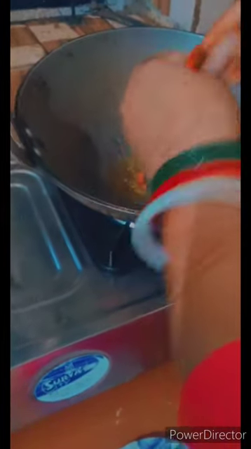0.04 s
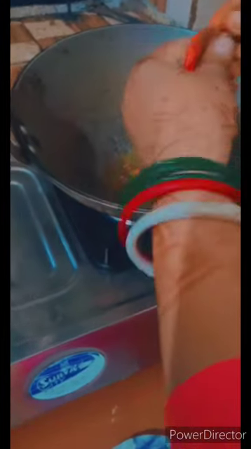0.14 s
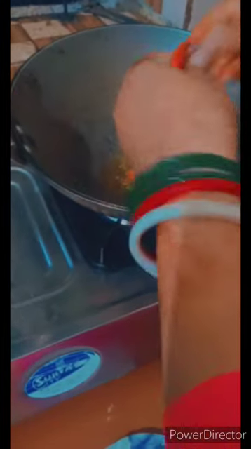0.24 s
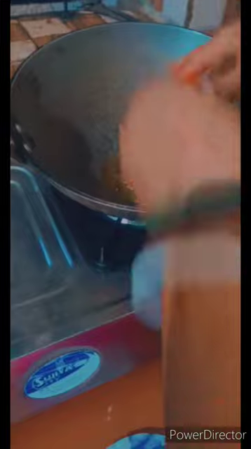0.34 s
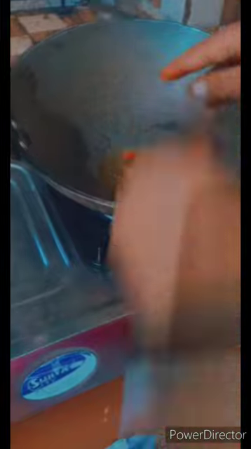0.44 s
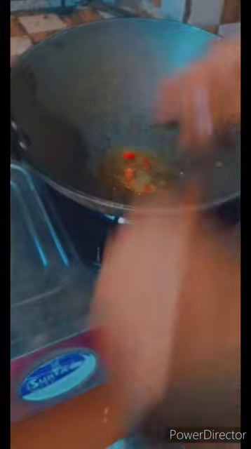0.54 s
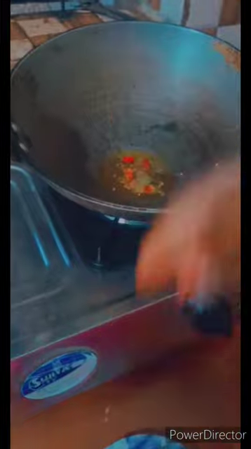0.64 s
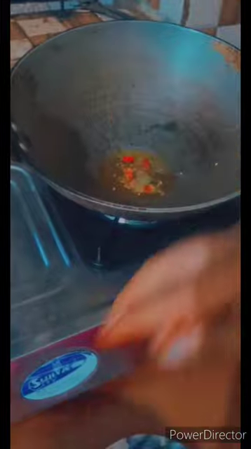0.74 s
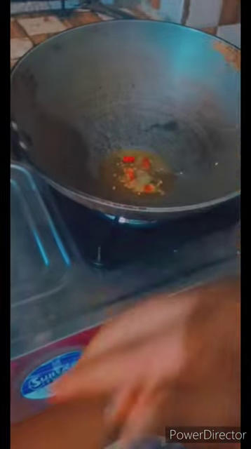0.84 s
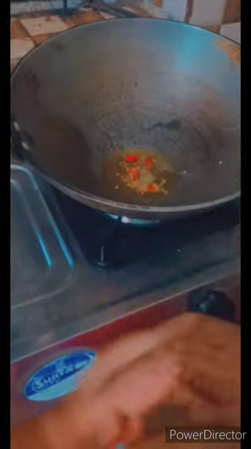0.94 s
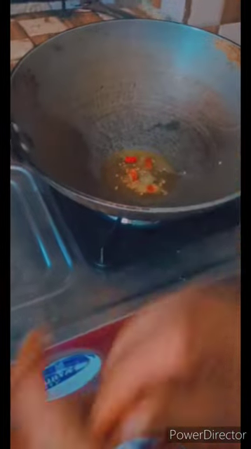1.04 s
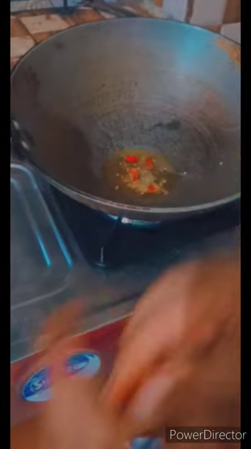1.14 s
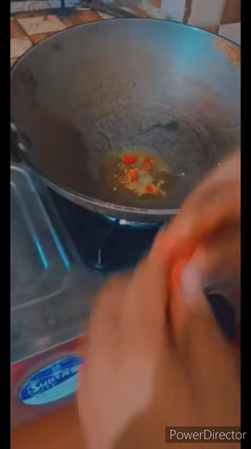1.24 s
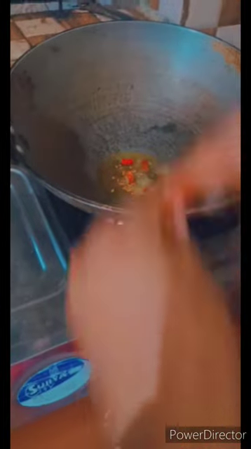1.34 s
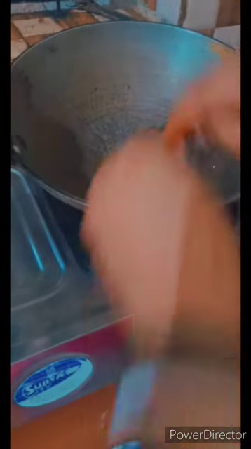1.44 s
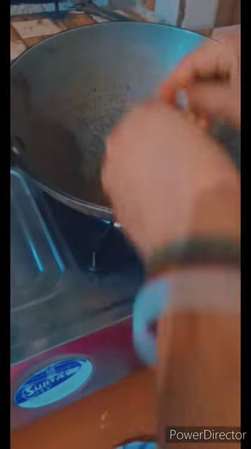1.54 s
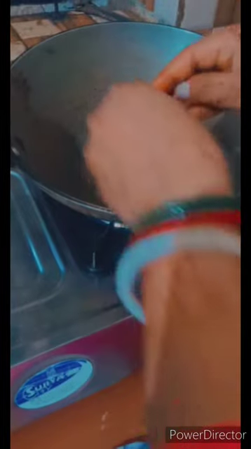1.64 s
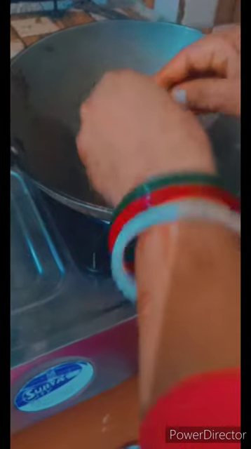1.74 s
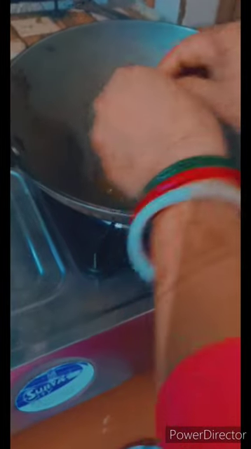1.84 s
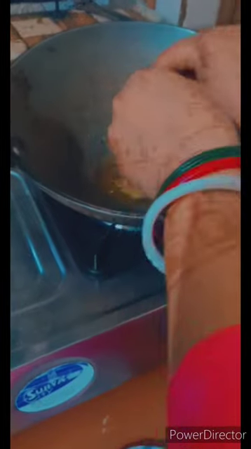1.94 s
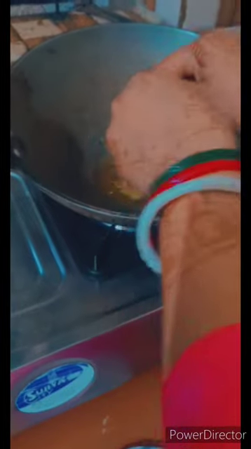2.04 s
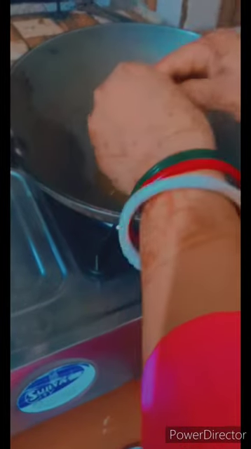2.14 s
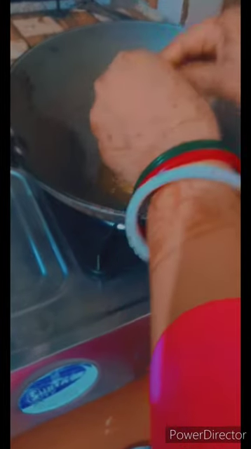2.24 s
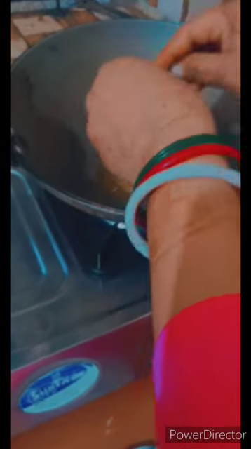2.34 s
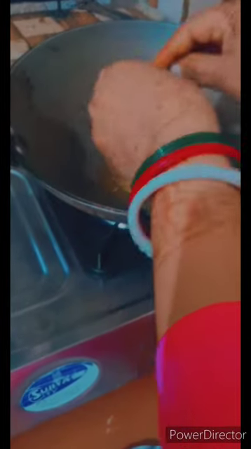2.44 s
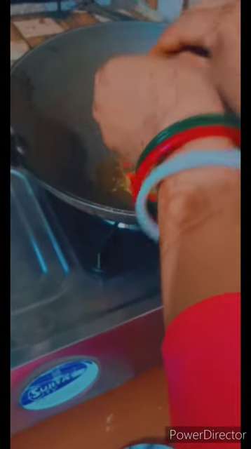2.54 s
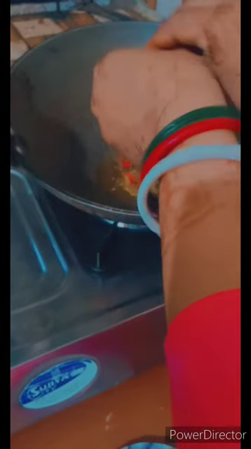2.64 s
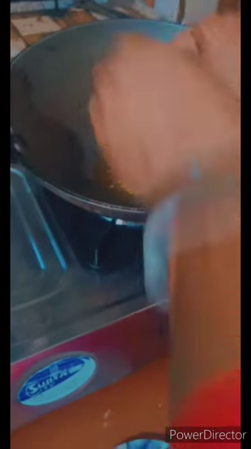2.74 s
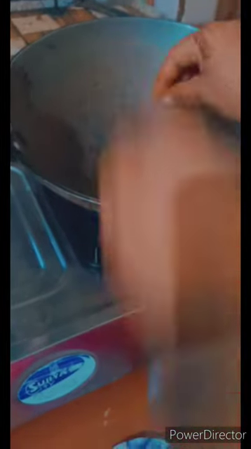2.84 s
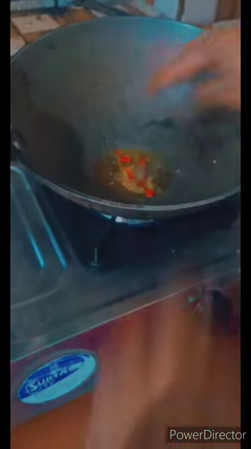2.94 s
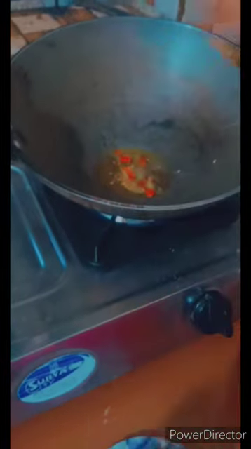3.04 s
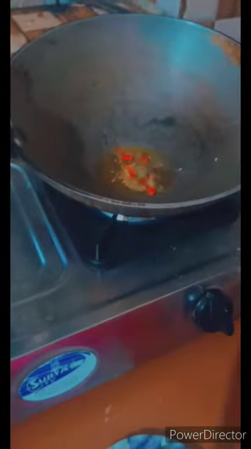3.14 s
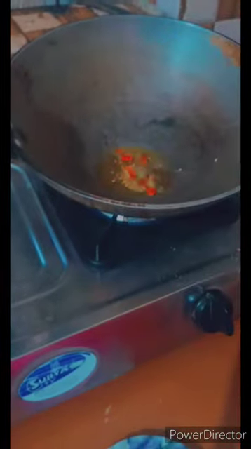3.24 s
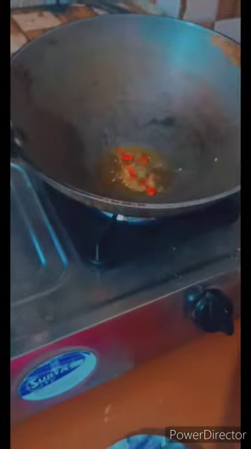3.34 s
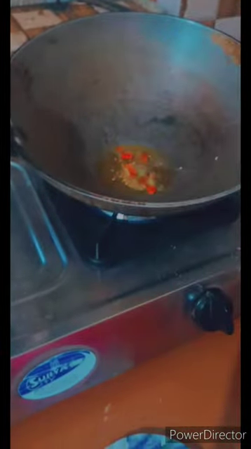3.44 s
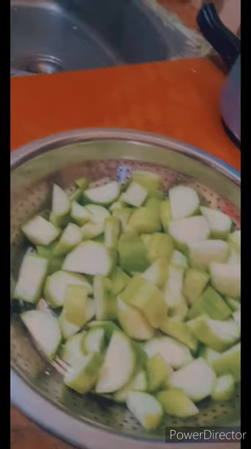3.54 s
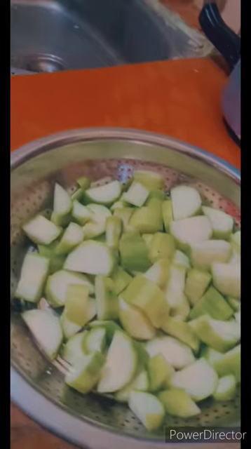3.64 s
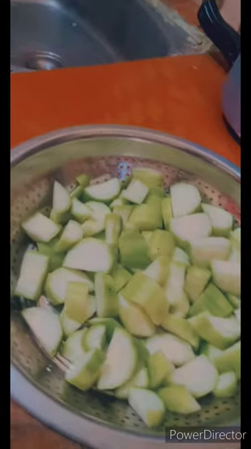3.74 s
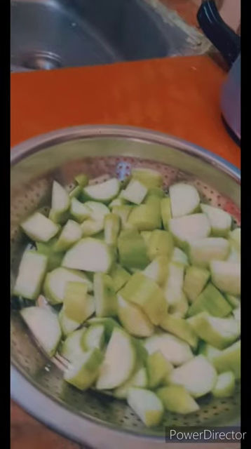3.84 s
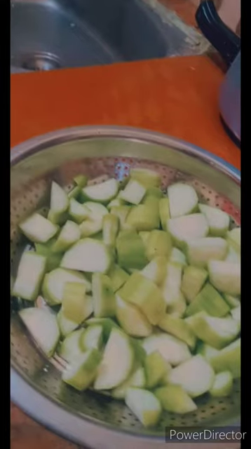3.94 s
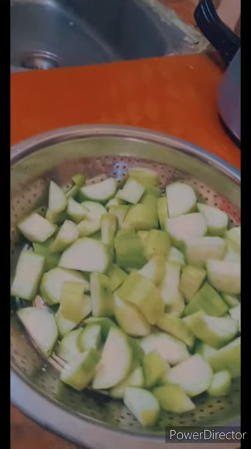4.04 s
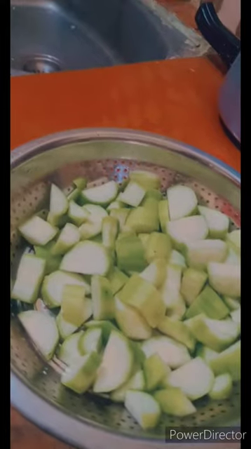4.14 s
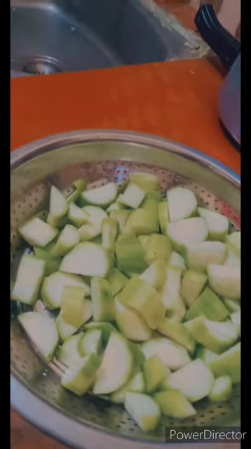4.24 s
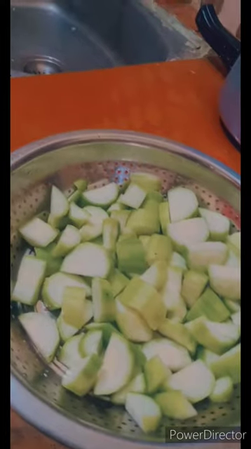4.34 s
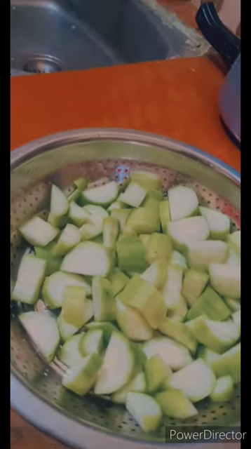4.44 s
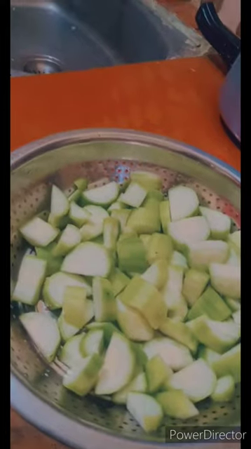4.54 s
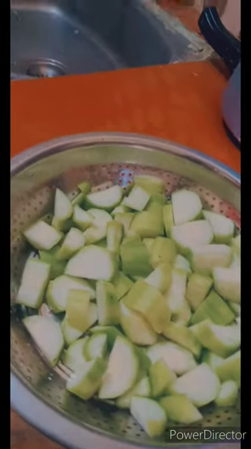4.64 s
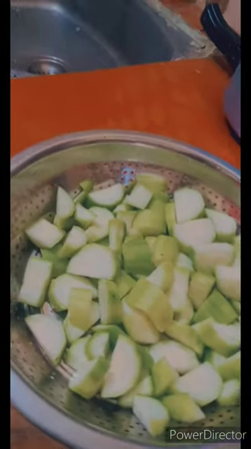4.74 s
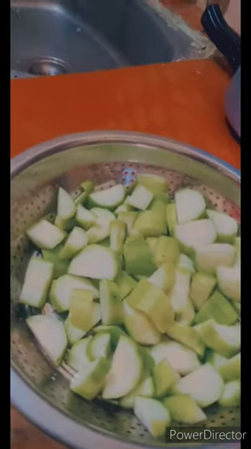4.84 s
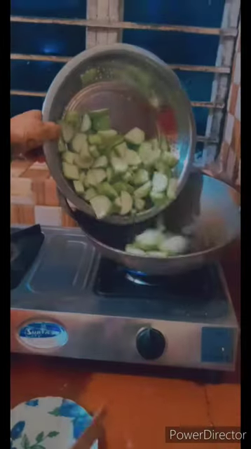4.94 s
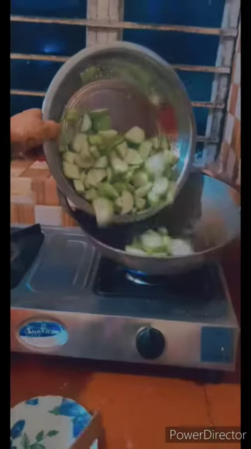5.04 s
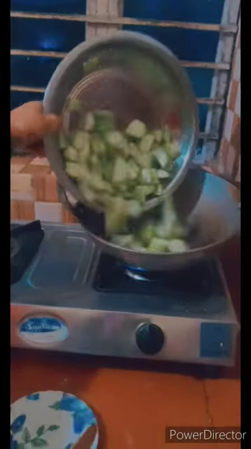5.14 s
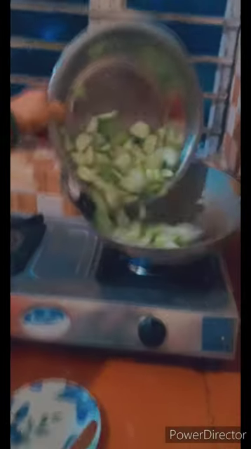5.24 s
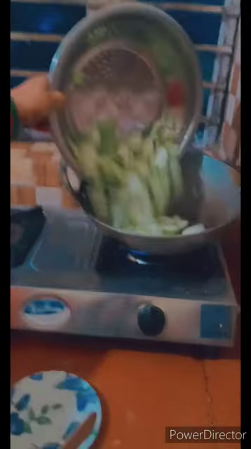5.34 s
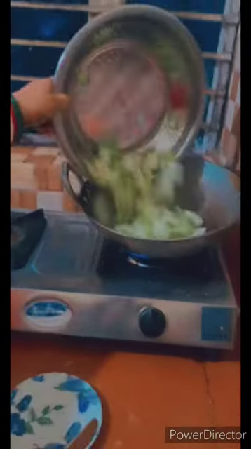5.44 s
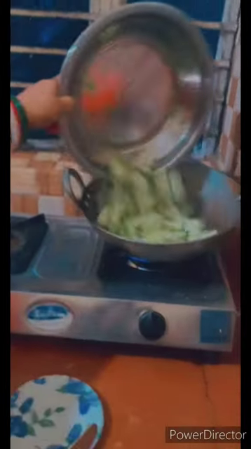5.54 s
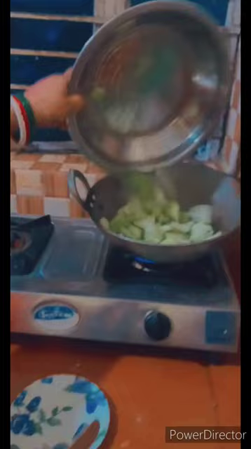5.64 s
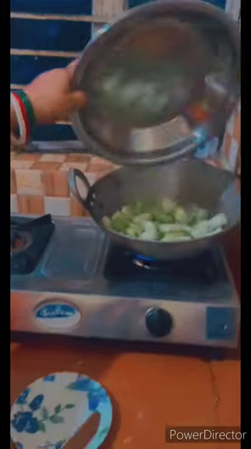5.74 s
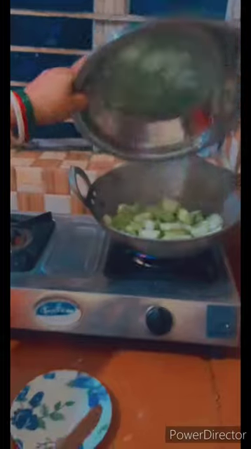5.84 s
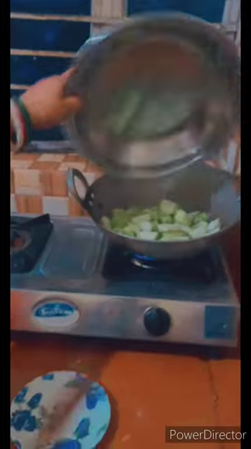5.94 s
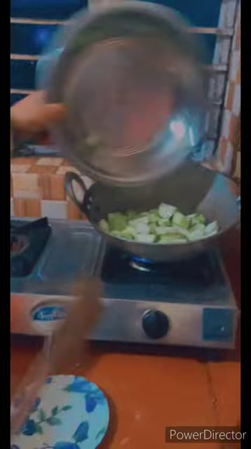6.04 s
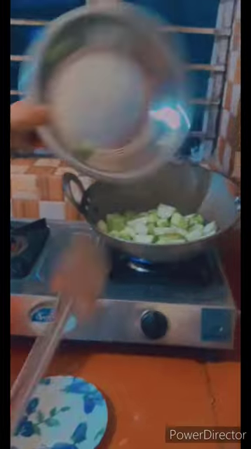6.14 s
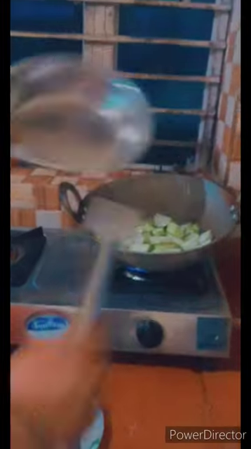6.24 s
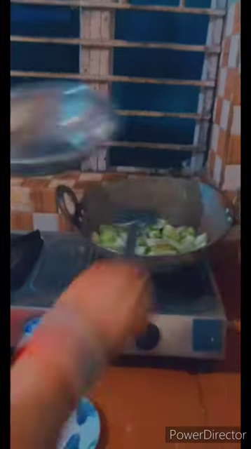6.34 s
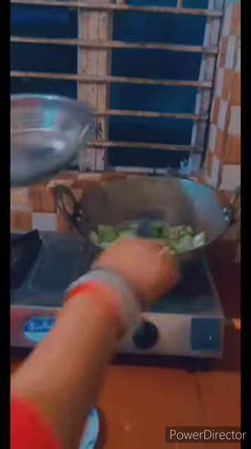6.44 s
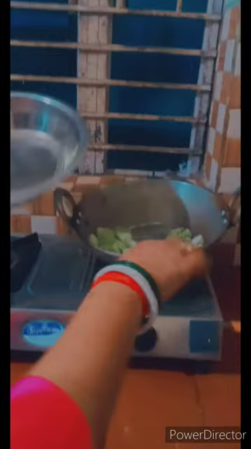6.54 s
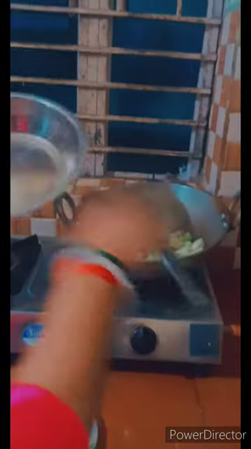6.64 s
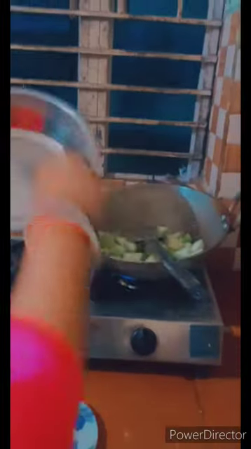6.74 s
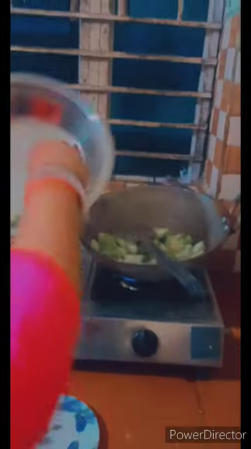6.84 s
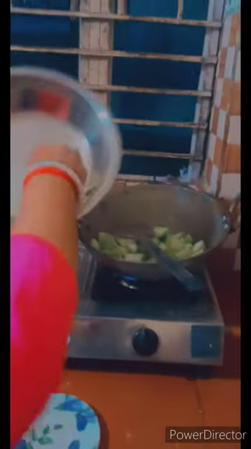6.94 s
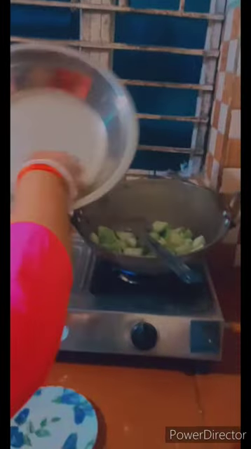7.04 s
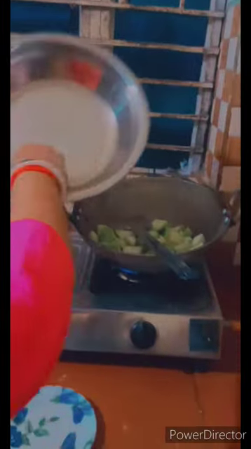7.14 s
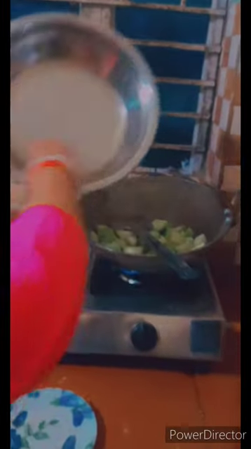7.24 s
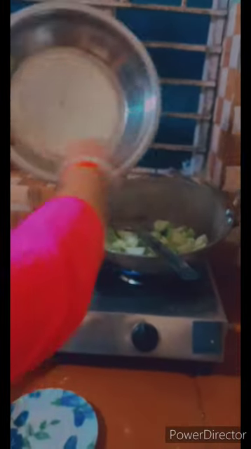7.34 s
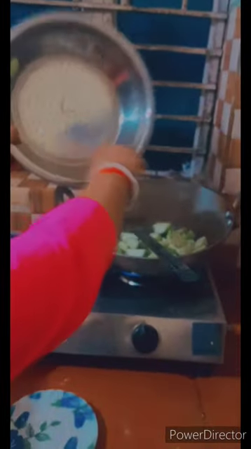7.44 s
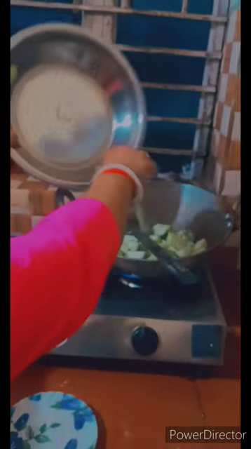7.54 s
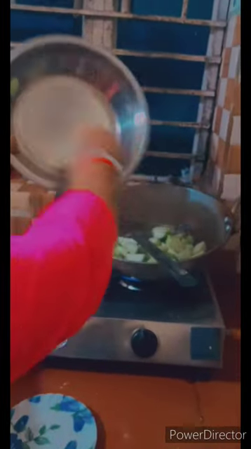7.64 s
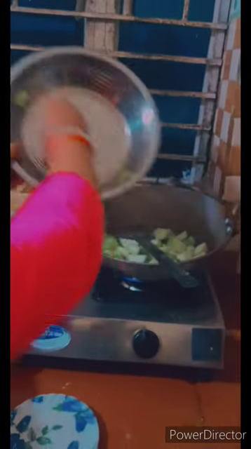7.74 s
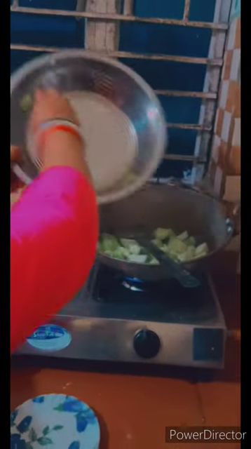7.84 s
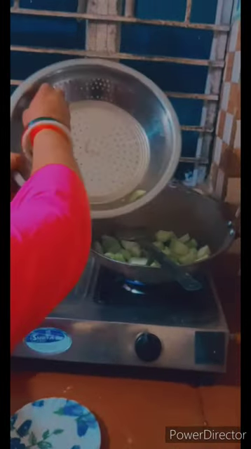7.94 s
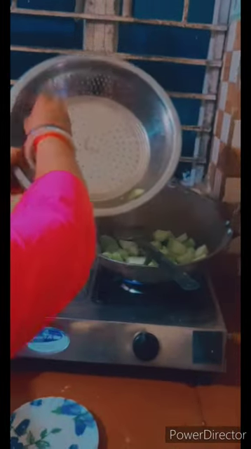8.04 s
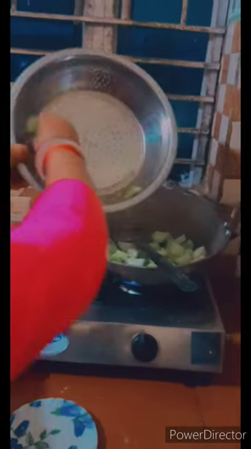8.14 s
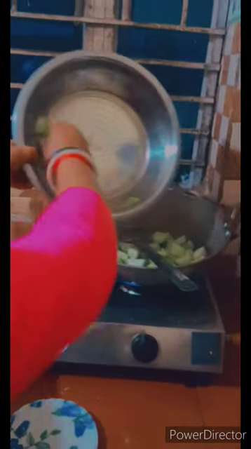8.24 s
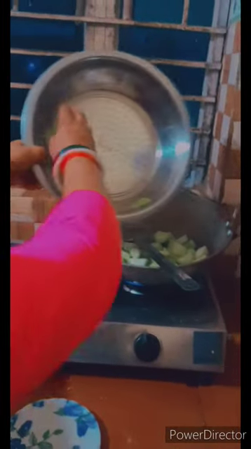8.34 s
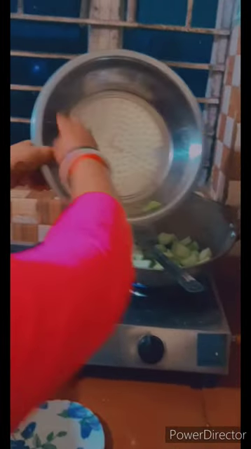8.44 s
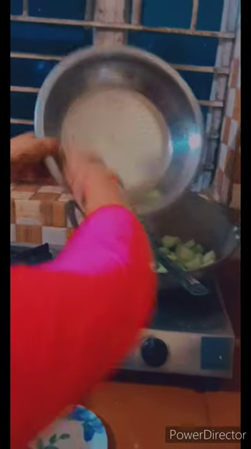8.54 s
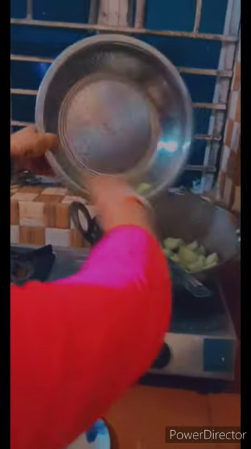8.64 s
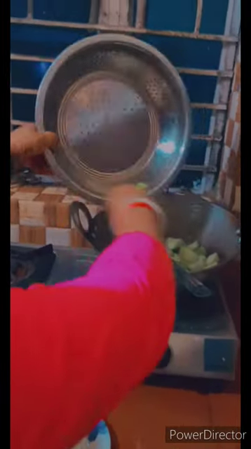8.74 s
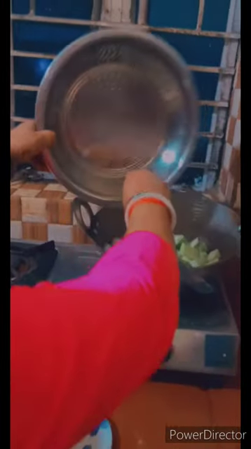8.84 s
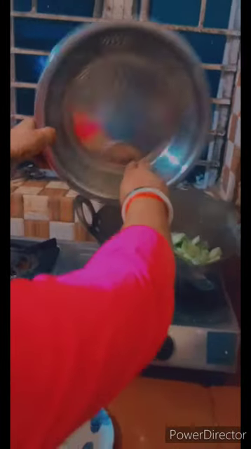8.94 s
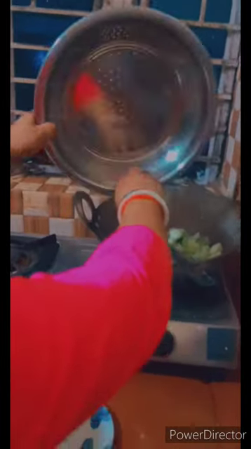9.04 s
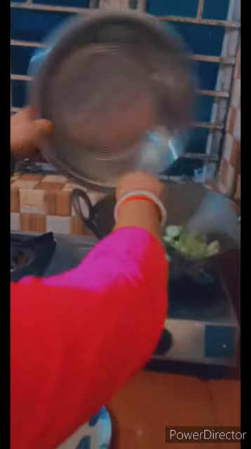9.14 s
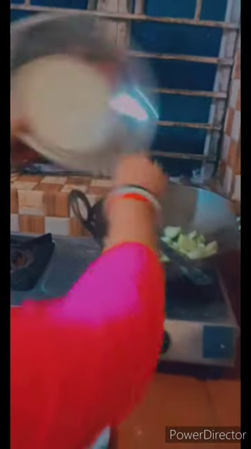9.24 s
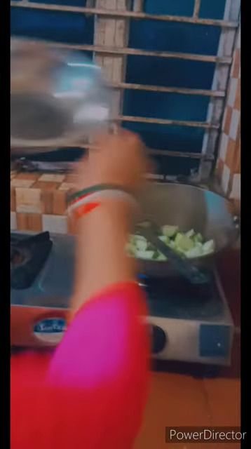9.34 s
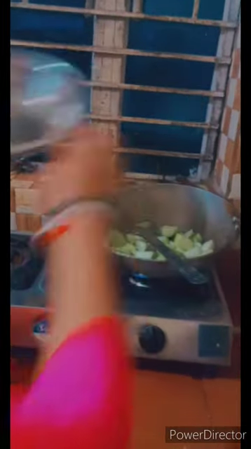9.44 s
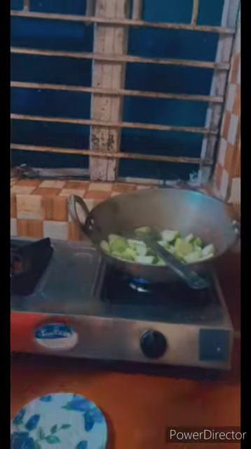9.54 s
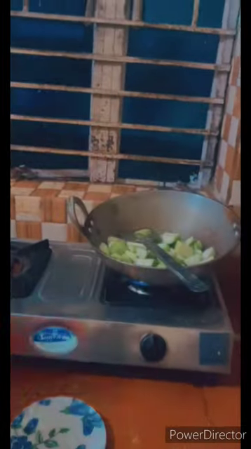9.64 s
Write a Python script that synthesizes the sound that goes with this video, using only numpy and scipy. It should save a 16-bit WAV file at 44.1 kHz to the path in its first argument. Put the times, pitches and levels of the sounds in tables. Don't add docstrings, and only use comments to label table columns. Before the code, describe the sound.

A tiled home kitchen, heard an arm's length from the pan. From 0 to 3.5 s, hot oil spits irregularly over low fan hum, soft flame hiss and room rumble: dry snaps and pitched pops, strongest around 1.3 and 1.75 s, with another snap near 2.95 s. Thin glass bangle clicks come at about 0.3, 0.4 and 2.3 s; a sleeve brushes softly near 2.8 s. A tiny silent cut leads to a quieter shot from 3.6 to 4.9 s, with a few faint pops and ringing drops at 4.4 s. After another gap, at about 5.1 s vegetables land and a loud, dense, bright sizzle flares, with one pop at 5.5 s. At 6.54 s a steel spatula clangs on the pan, its edge rattling until 6.75 s. The sizzle, slightly duller and gently fluctuating, continues to about 9.7 s.

```python
import sys
import numpy as np
from scipy import signal
from scipy.fft import rfft, irfft
from scipy.io import wavfile
from scipy.ndimage import uniform_filter1d

SR = 44100
rng = np.random.default_rng(int(sys.argv[2]) if len(sys.argv) > 2 else 0)


def wav_record(signal):
    frames = np.transpose(np.atleast_2d(signal))
    bounded = np.clip(frames, -1, 1)
    quanta = np.round(bounded * 32767).astype(np.int16)
    wavfile.write(sys.argv[1], SR, quanta)


def ratio_of_db(decibels):
    return 10 ** (np.asarray(decibels, float) / 20)


N = 427329

# start in seconds, step up to full level in
# seconds, end in seconds, motor in Hz, mains hum in Hz, moment in seconds when both hums swell together.
SHOTS = [
    (-1, -.9, 3.5, 48.1, 100.08, 3.23),
    (3.602, 3.647, 4.902, 48.1, 100.0, 4.35),
    (4.998, 5.081, 11, 48.09, 100.0, 8.27),
]
# frequency in Hz, level in dB per Hz.
FRY_SPECTRUM = [(88, -52), (160, -26.5), (250, -26), (396, -30), (520, -23.5), (1030, -13.5), (2230, -5),
                (3050, -5), (4600, -2.5), (6000, -5.5), (7900, -20), (13700, -12.5), (14700, -4.5),
                (15600, -3.5)]
# frequency in Hz, width in Hz, boost in dB.
PAN_RESONANCES = [(470, 25, 5), (528, 30, 8), (590, 30, 4), (680, 25, 5), (721, 20, 5), (786, 30, 6),
                  (843, 20, 4), (895, 25, 4), (1100, 50, 5), (1200, 30, 3), (1287, 30, 4), (1394, 35, 6),
                  (1485, 30, 5), (1660, 40, 4), (1770, 50, 4), (2046, 60, 3), (2273, 110, 2.8),
                  (2520, 45, 2)]
# frequency in Hz, width in Hz, boost in dB.
BOWL_COLOUR = [(1103, 48, 8.5), (2550, 120, 4), (2370, 150, -2), (690, 250, 3.5)]
# time in seconds, level in dB.
FRYING_EFFORT = [
    (5.09, -24),
    (5.14, -21),
    (5.31, -20.5),
    (5.5, -21),
    (5.85, -21.5),
    (6.45, -22.5),
    (6.85, -23),
    (8.8, -22.5),
    (9.69, -23.5),
]


def frying():
    bubbles_per_s, smear_t60 = 1500, 0.031
    gust_db = 0.39
    sizes = ratio_of_db(1.3 * np.minimum(rng.exponential(1, N), 5))
    bursts = sizes * (rng.random(N) < bubbles_per_s / SR) * rng.standard_normal(N)
    smear = rng.standard_normal(1500) * ratio_of_db(-60 * np.arange(1500) / SR / smear_t60)
    drive = evened(0.51 * evened(signal.oaconvolve(bursts, smear)[:N]) + rng.standard_normal(N))

    def field(hz, t):
        high = np.clip(np.log2((hz + 1) / 6500) * 3, 0, 1)
        low = np.clip(np.log2(2000 / (hz + 1)), 0, 1)
        age = np.maximum(t - SHOTS[-1][1], 0)
        wet_db, fresh_db, dry_out_s = -19, -16.5, 1.3
        treble_db = wet_db + (fresh_db - wet_db) * np.exp(-age / dry_out_s)
        steady_db, pour_db, pour_s = -16, -11, 0.35
        tumble_db = steady_db + (pour_db - steady_db) * np.exp(-(age / pour_s) ** 2)
        tumble_db = tumble_db + 2 * gust_db * wander(t, 11)
        tumble_db = tumble_db - 2 * np.clip((6.6 - t) / 0.13, 0, 1)
        lean_db = high * (treble_db + 10) + low * (tumble_db + 16)
        lean_db = lean_db - boosts([(1430, 2400, 4.7)], hz) * np.clip(7 - t, 0, 1)
        lean_db = lean_db + boosts(BOWL_COLOUR, hz) * np.clip(6.76 - t, 0, 1)
        hiss_db = band_db(read(FRY_SPECTRUM, hz), hz, 1500, 7000)
        return hiss_db + lean_db + patches(hz, t, 0.7)

    t = np.arange(N) / SR
    pan = ratio_of_db(1.3 * boosts(PAN_RESONANCES, np.fft.rfftfreq(N, 1 / SR)))
    hiss = np.fft.irfft(np.fft.rfft(shaped(drive, field)) * pan, N)
    effort_db = np.interp(t, *np.transpose(FRYING_EFFORT)) + gust_db * wander(t, 15)
    return hiss * ratio_of_db(effort_db) * (t > SHOTS[-1][0])


def spit(db, hz, treble_db, room_db, fall_db):
    t, f = np.arange(16384) / SR, np.fft.rfftfreq(16384, 1 / SR)
    octaves = np.log2((f + 1) / hz)
    body = ratio_of_db(-np.where(octaves < 0, fall_db, 23.5 + 0.25 * fall_db) * abs(octaves))
    walls = ratio_of_db(2.5 * evened(uniform_filter1d(rng.standard_normal(len(f)), size=120)))
    sheen_db = treble_db + 4.0 - 7 * abs(np.log2((f + 1) / 9000))
    sheen_db = sheen_db - 30 * np.clip(np.log2(3500 / (f + 1)), 0, 9)
    sheen = ratio_of_db(sheen_db + boosts([(15250, 1100, 15.8)], f))
    crack, tail, bright, core = rng.standard_normal((4, len(t)))
    # (delay s, gain)
    rim = [(0, 1), (0.001, 0.9), (0.0042, 0.35)]
    shape = sum(gain * ratio_of_db(-60 * (t - s) / 0.006) * (t >= s) for s, gain in rim)
    crack = irfft(rfft(crack) * (body + sheen)) * shape * np.minimum(t / 0.00017, 1)
    lowest_hz = hz * 2 ** (-30 / max(fall_db, 5))
    crack = signal.lfilter(*signal.butter(2, lowest_hz, "high", fs=SR), crack)
    tail = irfft(rfft(tail) * body * walls) * ratio_of_db(-60 * t / 0.28)
    tail += irfft(rfft(bright) * sheen) * ratio_of_db(-60 * t / 0.22)
    tail += 0.3 * irfft(rfft(core) * body ** 3) * ratio_of_db(-60 * t / 0.29)
    tail = tail / np.sqrt(np.mean((body + sheen) ** 2)) * ratio_of_db(room_db) * np.minimum(t / 0.00075, 1)
    tail = tail * ratio_of_db(1.5 * evened(uniform_filter1d(rng.standard_normal(len(t)), size=250)))
    return ratio_of_db(db) * (crack / abs(crack).max() + tail)


# start in seconds, peak level in dB, bubble pitch in Hz,
# treble share in dB, room share in dB.
SNAPS = [(0.2863, -36, 7760, -12, -10), (0.3339, -39.5, 5800, -17, -2), (0.4225, -25, 8300, -14, -26),
         (0.494, -34.5, 6170, -8, -27), (0.5724, -44, 6640, -20, -18), (0.7925, -44, 6730, -25, -5),
         (1.063, -43, 6400, -15, -18), (1.1178, -21.5, 7750, 7, -22), (1.3176, -13.5, 6640, -16, -17.5),
         (1.329, -13.5, 7800, -18, -22.5), (1.546, -43, 3350, -30, -9), (1.6933, -31, 6960, -7, -26),
         (2.0517, -38, 6580, 2, -11), (2.2881, -39, 6420, 4, -17), (2.9548, -17, 8700, -5, -21),
         (3.2318, -24.5, 8400, 12, -21), (3.651, -49, 4350, -41, -5), (3.7591, -29.5, 6370, -13, -8),
         (3.7857, -27.5, 4500, -25, -13.5), (3.905, -41.5, 4670, -9, -10), (4.267, -49, 6620, -15, -4),
         (4.4824, -42.5, 7200, -31, -9.5), (4.8545, -34.5, 3760, -30, -13)]
SPLASHES = [
    (.4185, -36, 4600, -15, -16),
    (.781, -56, 2700, -40, -4),
    (.838, -46, 3000, -8, -12),
    (1.33, -32, 3700, -30, -7),
    (2.4, -40, 4800, -15, -14),
    (4.371, -45, 2700, -30, -6),
]
POPS = [(0.0785, -22, 7360, -4, -20), (0.4065, -25, 4430, -13, -26), (0.779, -43, 6500, -30, -3),
        (1.5598, -17, 3730, -30, -19), (1.648, -46, 8000, -6, -14), (1.727, -31, 6500, -10, -18),
        (1.7305, -27, 6270, -20, -15), (1.7449, -10.5, 5330, -17, -22), (1.7775, -11, 6400, -15, -21),
        (2.0765, -34, 3300, -18, -11), (2.32, -40, 6300, -17, -9), (2.4055, -30, 4440, -5, -13.5),
        (2.976, -29, 12000, -8, -23), (4.75, -34, 5700, -49, -7.5), (5.518, -13, 3700, -30, -8)]
PINGS = [
    (2.5145, -38, 5600, -29, -17),
    (2.7655, -37, 3800, -23, -9.5),
    (2.9653, -24, 4300, -16, -19),
    (4.362, -25, 4250, -30, -10),
]
RUSTLES = [
    (2.785, -57.5, 2200, -28, -5),
    (2.815, -54, 1620, -31, -3),
]


def spits_and_rustles():
    out = np.zeros(N)
    kinds = [(SNAPS, 13, -0.19), (SPLASHES, 13, -0.19), (POPS, 25.6, 0.47), (PINGS, 48, 0), (RUSTLES, 9.9, 0)]
    for rows, fall_db, per_db in kinds:
        for s, db, hz, treble_db, room_db in rows:
            add(out, s, spit(db, hz, treble_db, room_db, fall_db + per_db * (db + 30)))
    return out


# start in seconds, peak level in dB, pitch in Hz,
# 60 dB decay in seconds.
BELL_DROPS = [(4.362, -26, 4080, .05), (4.365, -24, 3880, .04), (4.3685, -25, 4150, .05),
              (4.374, -33, 4150, .12), (.78, -42, 6300, .06), (.792, -29.5, 6400, .07),
              (.797, -33, 6450, .05), (.8025, -30, 6400, 0.033), (.816, -35, 6800, .04),
              (.821, -39, 6700, .03), (2.079, -36, 3400, .05), (2.083, -43, 3250, .05)]


def drops():
    out = np.zeros(N)
    for s, db, hz, t60 in BELL_DROPS:
        modes = [(hz, 0, t60), (1.13 * hz, -5, 0.6 * t60), (0.88 * hz, -7, 0.6 * t60), (1.4 * hz, -18, t60)]
        add(out, s, ratio_of_db(db) * ring(modes, 1))
    return echoed(out, -9, 0.3, 12000)


# mode in Hz, level in dB, 60 dB decay in seconds.
PAN_RING = [(505, -36, .4), (468, -43, .4), (1114, -33, .6), (1448, -29, .8), (1628, -25.5, .5),
            (1915, -25, .45), (2230, -20, .8), (2536, -21, .1), (3876, -27, .2), (4630, -26, .25),
            (5114, -21.5, .85), (6293, -25, .2), (6600, -28, .15), (6928, -27, .2)]
# mode in Hz, level in dB, 60 dB decay in seconds.
SPINE_RING = [(3704, -20.5, 2), (6132, -27, .2), (5857, -29, .3)]
# mode in Hz, level in dB, 60 dB decay in seconds.
FIRST_TOUCH = [(5290, -14.5, .04), (5450, -21, .03)]
# mode in Hz, level in dB, 60 dB decay in seconds.
EDGE_RING = [(505, -39, .2), (1912, -25, .14), (2536, -19, .11), (2966, -27, .07), (3900, -26, .1),
             (4630, -26, .08), (5416, -13, .09), (5857, -26, .08), (6128, -26, .09), (6928, -26, .11),
             (14640, -31, .1)]
# start in seconds, level in dB.
BOUNCES = [(6.5495, -11), (6.556, -15), (6.569, -13), (6.5885, -16), (6.628, -1), (6.6335, -7),
           (6.6445, -10), (6.658, -5), (6.671, -10), (6.675, -7), (6.686, -9), (6.6945, -8), (6.7105, -11),
           (6.722, -14), (6.738, -14), (6.75, -16)]


def spatula():
    land_s, grip_s, still_s = 6.5415, 6.579, 6.69
    out, t = np.zeros(N), np.arange(200) / SR
    add(out, land_s, clang(PAN_RING, still_s - land_s) + clang(SPINE_RING, grip_s - land_s))
    add(out, land_s - 0.0025, clang(FIRST_TOUCH, 1))
    for s, db in BOUNCES:
        add(out, s, ratio_of_db(db) * clang(EDGE_RING, 1))
        click_db = -13 + 0.33 * db - 60 * t / 0.0035
        add(out, s, ratio_of_db(click_db) * np.sin(2 * np.pi * rng.uniform(3200, 5000) * t))
    return out


# start in seconds, peak level in dB.
CLICKS = [
    (0.288, -28),
    (0.313, -33),
    (0.4233, -25),
    (2.321, -36.5),
    (3.7398, -52),
]
# mode in Hz, level in dB, 60 dB decay in seconds.
GLASS = [
    [(4100, -12, 0.078), (7200, -14, 0.083), (7768, -12, 0.045), (8200, -8, 0.061), (11680, -13, 0.067),
     (12700, -2, 0.039), (13130, -21, 5.0), (14300, -5, 0.11), (15430, -35, 5.0)],
    [(4130, -24, 0.089), (7321, -12, 0.083), (7800, -1, 0.045), (8226, -14, 0.055), (11680, -9, 0.067),
     (12420, 0, 0.039), (13130, -23, 5.0), (14300, -9, 0.11), (15430, -35, 5.0)],
    [(4430, -22, 0.046), (8600, -7, 0.028), (9814, -41, 0.16), (12230, -13, 0.05), (12880, -28, 0.13),
     (13590, -31, 0.39), (14500, 2.5, 0.024), (14920, -35, 0.049)],
    [(4670, -8, 0.17), (5200, -1, 0.17), (5690, -4, 5.0), (6400, -1, 0.14), (7171, -6, 0.18),
     (8200, -9, 0.16), (9006, -6, 0.16), (10400, -11, 0.11), (14700, -8, 0.13)],
    [(5459, -13, 5.0), (7000, -10, 0.62), (7623, -7, 0.081)],
]


def bangles():
    out = np.zeros(N)
    for (s, db), modes in zip(CLICKS, GLASS):
        add(out, s, ratio_of_db(db) * ring(modes, 0.17))
    chatter = 1 + 0.6 * evened(uniform_filter1d(rng.standard_normal(N), size=120))
    return echoed(out * chatter, -9, 0.12, 16000)


# mains hum level in dB, then the level of each motor tone in dB rms.
HUM_DB = [(-58.5, -76, -76, -63, -82, -88, -90), (-62, -74, -79, -65.5, -76, -79, -67),
          (-60, -75, -78, -63, -84, -85, -80)]
MOTOR_ORDERS = (1, 1.92, 2, 5, 7, 9)
# time in seconds, level in dB.
FOURTH_ORDER = np.concatenate([ [(0.0, -67.5), (1.1, -58), (1.73, -74), (1.82, -60), (2.22, -70),
                (3.49, -64)], [(3.66, -88), (3.786, -61.5), (4.43, -61.5), (4.498, -81), (4.554, -62),
                (4.89, -65)], [(5.1, -57), (6.74, -63.5), (7.32, -56.5), (9.16, -59.5), (9.64, -55.5),
                (9.69, -62)], ])
TENTH_DB = [-68, -75, -97]


def hum():
    t, out = np.arange(N) / SR, np.zeros(N)
    waver_db, tenth_waver_db = 2, 1
    low_db = waver_db * wander(t, 11.0)
    tenth_db = tenth_waver_db * wander(t, 9.0)
    fourth_db = np.interp(t, *np.transpose(FOURTH_ORDER)) + waver_db * wander(t, 9.0)
    slow = uniform_filter1d(uniform_filter1d(rng.standard_normal(N), size=1500), size=1500)
    flutter = evened(1 + evened(slow))
    for shot, levels_db, throb_db in zip(SHOTS, HUM_DB, TENTH_DB):
        start, _, end, motor_hz, mains_hz, together = shot
        turn = 2 * np.pi * (t - together)
        tones_hz = [mains_hz] + [k * motor_hz for k in MOTOR_ORDERS]
        tones = ratio_of_db(low_db) * sum(ratio_of_db(db) * np.cos(f * turn) for f, db in zip(tones_hz, levels_db))
        tones += ratio_of_db(fourth_db) * np.cos(4 * motor_hz * turn)
        tones += ratio_of_db(throb_db + tenth_db) * flutter * np.cos(10 * motor_hz * turn)
        out += np.sqrt(2) * tones * (t > start) * (t <= end)
    return out


# frequency in Hz, level in dB per Hz.
AIR_SPECTRUM = [(24, -25.5), (55, -8.5), (150, -13.5), (300, -13), (600, -21.5), (1000, -26.5),
                (2000, -30.5), (3300, -30.5), (5000, -29), (6500, -23), (8500, -27), (13500, -34),
                (14900, -27), (15600, -21.5)]
# frequency in Hz, width in Hz, boost in dB.
AIR_PEAKS = [(3200, 50, 3.5), (1090, 180, 7.5), (330, 57, -4.5), (74, 26, 10), (6470, 220, 7),
             (4400, 310, 5)]
# middle in seconds, hiss lift in dB, rumble lift in dB,
# half length in seconds.
STIRS = [(0.0, 12.5, 6, 0.077), (0.513, 6.5, 5, 0.22), (1.434, 5.5, 5.5, 0.25), (1.753, 6, 5, 0.25),
         (2.12, 0.5, 5.5, .2), (2.4, 0, 4, .1), (2.846, 9, 8, 0.12), (3.438, 0.5, 7.5, 0.082),
         (3.654, -6.5, 4.5, .12), (3.823, 2.5, 7.5, 0.24), (4.15, -2.5, 4, 0.11), (4.44, 2.5, 5, 0.18),
         (4.79, -1, 5.5, 0.15)]


def air():
    still_hiss_db, still_rumble_db = -63.5, -71

    def field(hz, t):
        stir_db, low_db = 0, 0
        for s, hiss_lift_db, rumble_lift_db, half_s in STIRS:
            nearness = np.clip(1 - abs(t - s) / half_s, 0, 1)
            stir_db = stir_db + hiss_lift_db * nearness
            low_db = low_db + rumble_lift_db * nearness
        high = np.clip(np.log2((hz + 1) / 1500), 0, 1)
        spectrum_db = read(AIR_SPECTRUM, hz)
        hiss = band_db(spectrum_db, hz, 2500, 15500) + still_hiss_db + stir_db
        swell_db = low_db + 0.8 * wander(t, 8.0)
        rumble = band_db(spectrum_db, hz, 220, 1500) + still_rumble_db + (hz > 220) * swell_db
        return high * hiss + (1 - high) * rumble + boosts(AIR_PEAKS, hz) + patches(hz, t, 2.4)

    return echoed(shaped(rng.standard_normal(N), field), -5, 0.046, 6700)


def ring(modes, longest):
    t = np.arange(SR // 2) / SR
    x = sum(ratio_of_db(db - 60 * t / min(t60, longest)) * np.sin(2 * np.pi * (hz * t + rng.random()))
            for hz, db, t60 in modes)
    return x / abs(x).max() * np.minimum(t / 0.00044, 1)


def clang(modes, free_s):
    t = np.arange(SR // 2) / SR
    x = sum(ratio_of_db(db - 60 * t / t60) * np.sin(2 * np.pi * (hz * t + rng.random())) for hz, db, t60 in modes)
    return x * np.minimum(t / 0.002, 1) * ratio_of_db(-60 * np.maximum(t - free_s, 0) / 0.06)


def echoed(x, echo_db, t60, top_hz):
    t = np.arange(8192) / SR
    echoes = rng.standard_normal(len(t)) * ratio_of_db(-60 * t / t60) * (t > 0.001)
    echoes = signal.lfilter(*signal.butter(2, top_hz, fs=SR), echoes / np.linalg.norm(echoes))
    return x + ratio_of_db(echo_db) * signal.oaconvolve(x, echoes)[:N]


def shaped(x, field_db):
    hz, t, z = signal.stft(x, SR, nperseg=1024, noverlap=768)
    return signal.istft(z * ratio_of_db(field_db(hz[:, None], t)), SR, nperseg=1024, noverlap=768)[1][:N]


def patches(hz, t, db):
    spots = rng.standard_normal((len(t), len(hz))).T
    return db * evened(uniform_filter1d(uniform_filter1d(spots, size=12, axis=0), size=10, axis=1))


def wander(t, top_hz):
    rates_hz = top_hz * np.geomspace(0.1, 1, 16)
    return evened(sum(np.sin(2 * np.pi * (f * t + rng.random())) / np.sqrt(f) for f in rates_hz))


def boosts(peaks, hz):
    return sum(db / (1 + (2 * (hz - f) / width) ** 2) for f, width, db in peaks)


def read(points, hz):
    f, value = np.transpose(points)
    return np.interp(np.log(hz + 1), np.log(f + 1), value)


def band_db(points_db, hz, lo, hi):
    return points_db - 10 * np.log10(np.sum(ratio_of_db(points_db[(hz > lo) & (hz < hi)]) ** 2) / len(hz))


def evened(x):
    return x / np.sqrt(np.mean(x ** 2) + 1e-20)


def add(mix, s, sound):
    part = mix[round(s * SR):][:len(sound)]
    part += sound[:len(part)]


def scene():
    t = np.arange(N) / SR
    gain = np.zeros(N)
    for start, step, end, *_ in SHOTS:
        soft = ratio_of_db(-10.5) * np.clip((t - start) / 0.027, 0, 1)
        full = 0.71 * np.clip((t - step) / 0.0022, 0, 1)
        gain += (soft + full) * (t > start) * (t < end)
    trace = sum((t >= end) * (t < end + 0.013) for _, _, end, *_ in SHOTS[:2])
    sources = frying() + spits_and_rustles() + drops() + spatula() + bangles() + hum() + air()
    mono = gain * sources + ratio_of_db(-43) * trace * np.diff(air(), prepend=0)
    return np.array([mono, mono])


def roll_off(x):
    return signal.sosfilt(signal.butter(12, 16870, fs=SR, output="sos"), x)


# middle in seconds, low edge in Hz, high edge in Hz.
SPLITS = [(.587, 13800, 15200), (2.63, 4300, 5800), (3.095, 7600, 10400), (3.35, 8200, 9700),
          (5.37, 12400, 13900), (5.719, 11700, 13900), (5.765, 4400, 5900), (5.928, 4100, 5500),
          (6.276, 13000, 14700), (6.485, 5100, 6500), (6.764, 10300, 11800), (7.089, 4500, 5900),
          (7.158, 4500, 5900), (7.158, 9600, 11800), (7.716, 6200, 7700), (7.716, 8900, 10400),
          (7.808, 8900, 11100), (7.808, 13100, 14700), (8.25, 11700, 13200), (9.411, 7500, 9000)]


def record(dry):
    edge_hz = 15620
    band_limit = signal.firwin(1601, edge_hz, window=("kaiser", 9), fs=SR)
    cut = signal.oaconvolve(dry, band_limit[None], "same")
    hz, t, z = signal.stft(cut[0], SR, nperseg=1024, noverlap=768)
    split = 0
    for s, lo, hi in SPLITS:
        in_band = (hz[:, None] > lo) * (hz[:, None] < hi)
        split = split + in_band * np.cos(np.pi / 2 * np.clip((t - s) / 0.013, -1, 1))
    scattered = z * split * np.exp(2j * np.pi * rng.random(z.shape))
    side = signal.istft(scattered, SR, nperseg=1024, noverlap=768)[1][:N]
    return roll_off(cut + ratio_of_db(5) * side * [[1], [-1]])


dry = scene()
out = record(dry)
wav_record(out)
```